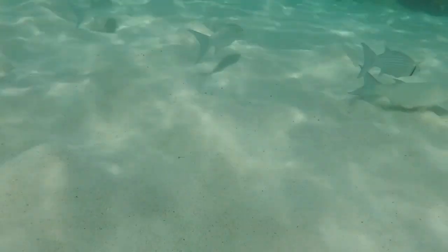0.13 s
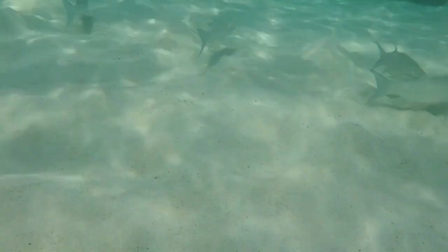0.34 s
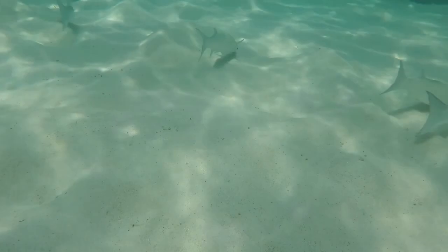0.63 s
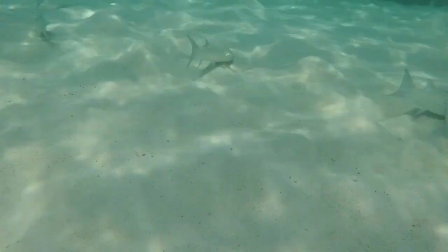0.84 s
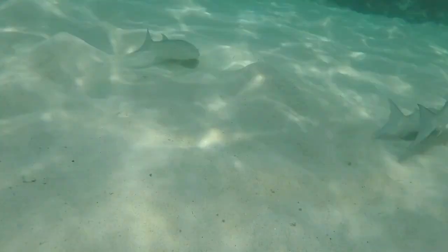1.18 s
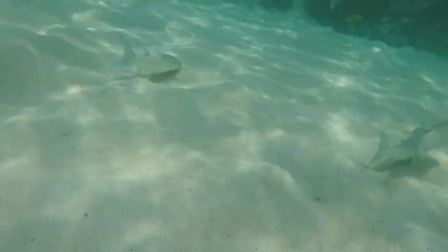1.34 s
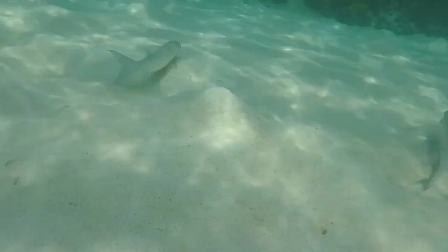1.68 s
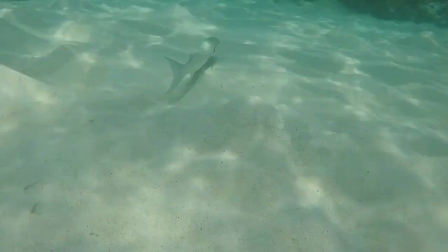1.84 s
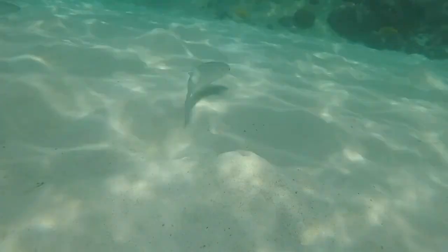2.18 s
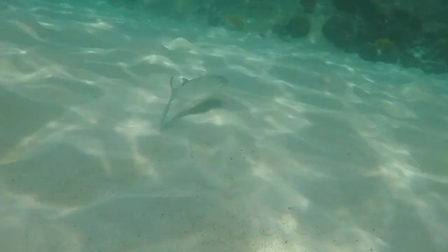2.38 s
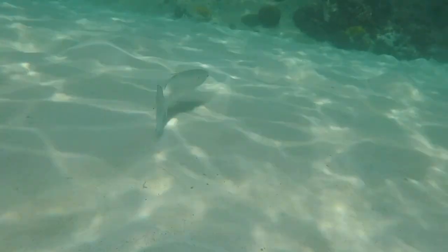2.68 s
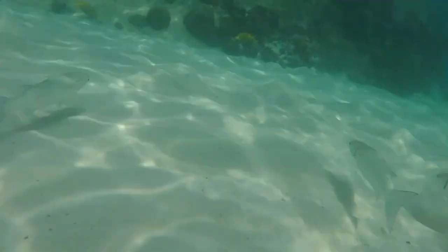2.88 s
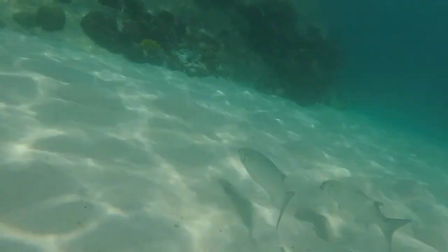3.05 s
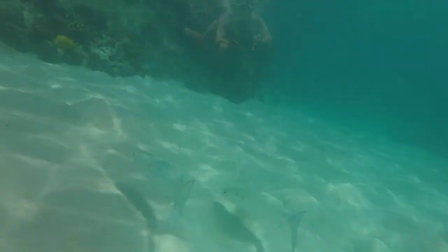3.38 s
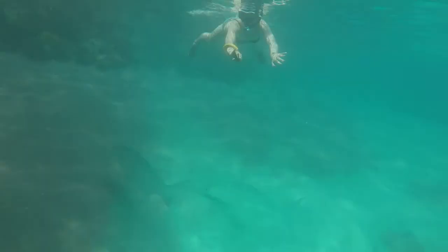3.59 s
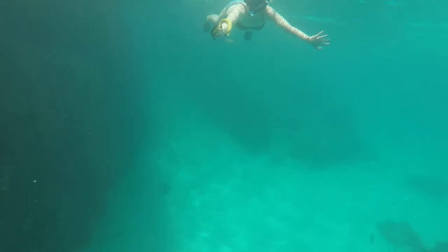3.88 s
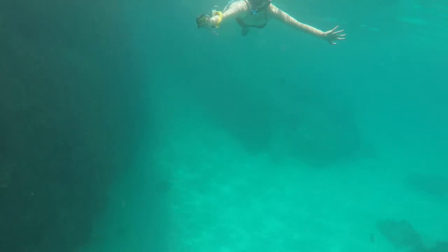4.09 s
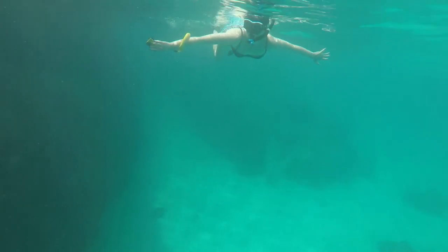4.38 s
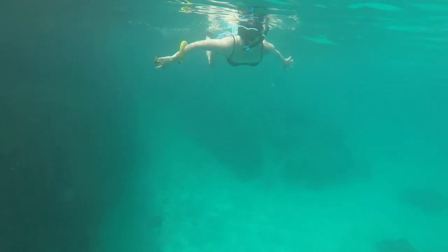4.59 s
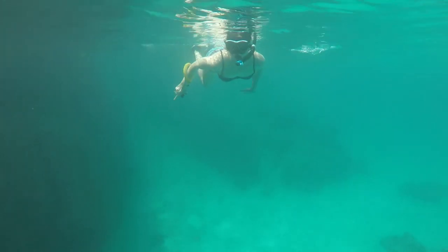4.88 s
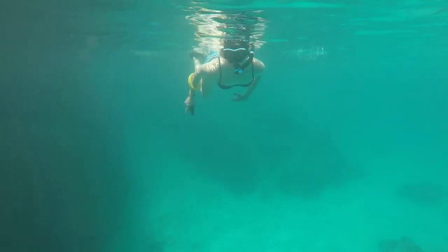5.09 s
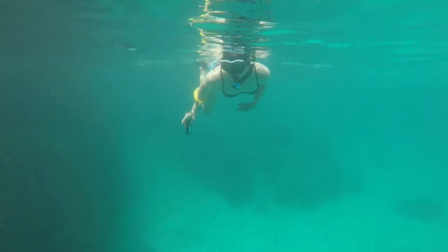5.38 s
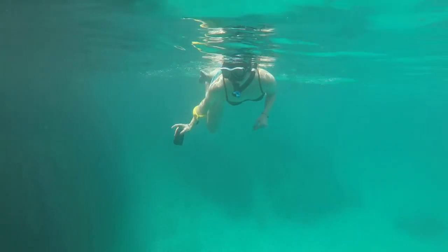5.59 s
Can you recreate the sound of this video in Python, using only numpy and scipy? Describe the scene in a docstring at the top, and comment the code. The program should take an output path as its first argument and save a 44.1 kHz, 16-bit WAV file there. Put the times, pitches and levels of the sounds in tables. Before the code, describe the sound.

Underwater rumble, hollow churning, bubbles and knocks against a camera housing, with fine shrimp crackle, stop suddenly, leaving faint hum, soft ticks and one last bubble.

```python
"""Water rushes round a waterproof camera case: shaped noise rumbles, and pulses churn in the case's resonances.
Bubbles ring as wobbling tones, gurgles as clusters of tones, and knocks as pushes through the case walls.
Behind them snapping shrimp crackle over a reef, made of short noise bursts and random clicks.
The rush stops abruptly and leaves a quiet, centred hum, a duller crackle and one last bubble."""
import sys
import numpy as np
from scipy import signal
from scipy.fft import rfft, irfft
from scipy.io import wavfile
from scipy.ndimage import uniform_filter1d

SR = 44100
rng = np.random.default_rng(int(sys.argv[2]) if len(sys.argv) > 2 else 0)


def put_to_file(sound):
    """Save the sound as 16-bit audio at rate SR, in the file named by the first command-line argument."""
    columns = np.atleast_2d(sound).T  # one column per channel
    safe = np.clip(columns, -1, 1)
    whole_steps = np.round(safe * 32767)
    wavfile.write(sys.argv[1], SR, whole_steps.astype(np.int16))


N = 253120
T = np.arange(N) / SR  # time of every sample (s)


def amp(db):
    """Decibels to gain."""
    return 10 ** (np.asarray(db) / 20)


def unit(x):
    """Scales to rms 1."""
    return x / np.sqrt(np.mean(x ** 2) + 1e-20)


def noise(*shape):
    """White noise: all pitches equally strong."""
    return rng.standard_normal(shape)


def tone(hz, t, phase=0):
    """A steady sine."""
    return np.sin(2 * np.pi * hz * t + phase)


def decay(t, t60):
    """A fade that drops 60 dB in t60 seconds."""
    return amp(-60 * t / t60)


def swell(t, rise_s):
    """A soft start with time constant rise_s."""
    return 1 - np.exp(-t / rise_s)


def read(points, hz):
    """Reads a table on a log-frequency axis."""
    f, value = np.transpose(points)
    return np.interp(np.log(hz + 1), np.log(f + 1), value)


def follow(rows, axis=1):
    """One column of a curve at every sample."""
    rows = np.array(rows)
    return np.interp(T, rows[:, 0], rows[:, axis])


def add(mix, s, sound):
    """Mixes a sound in at time s."""
    part = mix[..., round(s * SR):][..., :sound.shape[-1]]
    part += sound[..., :part.shape[-1]]


def band(x, lo_hz, hi_hz, order=3):
    """Causal band-pass."""
    return signal.sosfilt(signal.butter(order, [lo_hz, hi_hz], "band", fs=SR, output="sos"), x)


def colour(x, points, size=8192):
    """Causal filter of unit energy whose spectrum has the table's shape."""
    log_gain = np.log(amp(read(points, abs(np.fft.fftfreq(size, 1 / SR)))))
    # the Hilbert transform of the log gain gives the phase that makes the filter respond at once
    taps = np.fft.ifft(np.exp(np.conj(signal.hilbert(log_gain)))).real[:size // 2]
    taps = taps / np.linalg.norm(taps)
    return signal.fftconvolve(np.atleast_2d(x), taps[None], axes=1)[:, :N]


def spread(pair, likeness):
    """Mixes two unrelated signals into left and right of a given likeness."""
    same = np.clip(read(likeness, np.fft.rfftfreq(N, 1 / SR)), -1, 1)
    mid, side = irfft(rfft(pair) * np.sqrt([1 + same, 1 - same]), N) / np.sqrt(2)
    return np.array([mid + side, mid - side])


def clicks(per_s, spread_db):
    """Random clicks of uneven size and either sign."""
    size = amp(spread_db * np.minimum(rng.exponential(1, N), 4))
    return size * rng.choice([-1, 1], N) * (rng.random(N) < per_s / SR)


# How strongly water moves past the case; churn and blips follow it too.
# Each row: time in seconds, buffeting in dB, churning in dB (both are base levels).
WATER_FLOW = [(0.0, -30, -43), (0.08, -27, -37), (0.45, -31.5, -40.5), (1.66, -26, -40.5),
              (2.69, -28.5, -43), (2.91, -23, -45), (3.04, -26, -40.5), (4.01, -26.5, -42.5),
              (4.19, -24, -43.5), (4.3, -28, -43)]
# Tone of the rumbling eddies, also used by the wake. Each row: frequency in Hz, relative level in dB.
RUMBLE_TONE = [(10, -2), (22, 1.5), (45, -2.5), (70, -9.5), (100, -12.5), (128, -12.5), (190, -24.5),
               (330, -30), (700, -37), (6000, -100)]
# How alike the rumble is left and right. Each row: frequency in Hz, likeness from -1 to 1.
RUMBLE_LIKENESS = [(40, 0.75), (85, 0), (140, 0.034), (400, 0.77)]


def rumble():
    """Eddies buffet the case: low noise that follows the flow, a little stronger on the right."""
    eddies = spread(colour(noise(2, N), RUMBLE_TONE), RUMBLE_LIKENESS)
    return unit(eddies) * amp(follow(WATER_FLOW) + np.array([[1.0], [2.4]]))


# Resonances of the case. Each row: frequency in Hz, width in Hz before damping,
# relative level in dB before scaling by width, left-right phase difference in radians,
# left-right level difference in dB.
CASE_MODES = [(357.5, 47, -11.5, 0.086, 37.5), (466.6, 35, 1.5, 0.7, -6), (598.7, 64.6, 7, 1.13, 10),
              (935, 67, 8, 2.77, 2), (983, 256, 7.5, 2.934, -2), (1339, 135, 10.5, 2.156, 0),
              (1481, 55, -4.5, 5.56, 6), (1708, 97, -7.5, 1.7, -20), (2190, 140, -26, 2.9, 25),
              (2540, 110, -26.5, 0.4, 17), (2910, 120, -12.5, 0.5, 0)]


def case(x, damping_hz):
    """The walls ring, each mode reaching the two microphones in its own phase."""
    t, ring = T[:SR // 8], 0
    half = np.array([[.5], [-.5]])  # each side takes half of the difference
    for hz, width_hz, db, phase, lean_db in CASE_MODES:
        fade = np.exp(-np.pi * (width_hz + damping_hz) * t)
        wave = np.cos(2 * np.pi * hz * t + half * phase)
        ring = ring + amp(db + half * lean_db) * width_hz * fade * wave
    return signal.fftconvolve(x[None], ring, axes=1)[:, :len(x)]


def sides(hz):
    """Phase at the left and right microphone of a tone that passes the case."""
    modes = np.array(CASE_MODES)
    return np.array([[.5], [-.5]]) * np.interp(hz, modes[:, 0], modes[:, 3])


def patchy(x, depth_db):
    """Pockets of air come and go: narrow ranges of pitch are lifted or lowered for a moment."""
    z = signal.stft(x, nperseg=512)[2]
    field = noise(*z.shape[1:])
    for _ in range(2):  # smooth over pitch, then over time
        field = uniform_filter1d(uniform_filter1d(field, size=3, axis=0), size=6, axis=1)
    gain = amp(depth_db * np.clip(unit(field), -2, 2))
    return signal.istft(z * gain, nperseg=512)[1][:, :N]


def churn(surge_db=1.9):
    """Swarms of small pressure pulses ring the case, in uneven surges."""
    surge = amp(surge_db * unit(band(noise(N), 5.1, 17.8, order=2)))
    pulses = surge * clicks(per_s=1100, spread_db=2.7)
    ring = patchy(case(pulses, damping_hz=0), depth_db=3.8)
    low = unit(band(ring, 270, 1154)) * amp(follow(WATER_FLOW, axis=2) + 6.5)
    # the high resonances grow slowly: dB at the start, then dB per second
    high = unit(band(ring, 1207, 3030)) * amp(-41.5 + 0.57 * T)
    return low + high


# Larger bubbles. Each row: start in seconds, level in dB before the swell softens it, pitch in Hz,
# time to fade by 60 dB in seconds, swell time constant in seconds.
BUBBLE_LIST = [(.116, -16, 591, 0.075, 0.0044), (0.513, -24.5, 1316, 0.1, .001),
               (1.708, -22, 581, 0.12, 0.011), (1.916, -20.5, 1300, 0.068, 0.00043),
               (2.059, -16.5, 1344, 0.041, 0.00031), (2.166, -19, 1411, 0.056, 0.00041),
               (2.616, -17.5, 609, 0.074, 0.0073), (3.109, -15, 617, 0.093, 0.00028),
               (3.109, -12, 1200, 0.022, 0.00043), (3.126, -19.5, 1254, 0.07, .002),
               (3.195, -15, 621, 0.058, 0.0039), (3.212, -16, 642, 0.093, 0.0025),
               (3.213, -15, 1318, 0.076, 0.0018), (3.2533, -1, 1060, 0.013, 0.0012),
               (3.281, -18.5, 726, 0.037, 0.0018), (3.282, -13, 1325, 0.061, 0.0044),
               (3.378, -14.5, 1353, 0.055, 0.0024), (3.586, -17.5, 737, 0.034, 0.00034),
               (3.686, -15.5, 708, 0.035, .001), (3.781, -13.5, 630, 0.047, .005),
               (3.827, -20.5, 2610, 0.023, 0.0012), (3.902, -15, 680, 0.048, 0.0017),
               (3.916, -22, 1444, 0.035, 0.0012), (3.939, -26.5, 2580, 0.029, 0.0024),
               (3.976, -17.5, 1414, 0.025, .001), (4.083, -15.5, 615, 0.038, 0.0016),
               (4.25, -24, 1810, 0.039, .001), (4.338, -22, 1345, .05, .002)]


def bubbles():
    """Larger bubbles pinch off against the case and ring briefly, wobbling in pitch as they change shape."""
    out, t = np.zeros((2, N)), T[:SR // 6]
    for s, db, hz, t60, swell_s in BUBBLE_LIST:
        wobble = 0.041 * unit(band(noise(len(t)), 41, 340, order=2))  # share of the pitch
        turns = hz * np.cumsum(1 + wobble) / SR
        ring = tone(1, turns, sides(hz))
        add(out, s, ring * amp(db) * decay(t, t60) * swell(t, swell_s))
    return out


# Knocks on the case. Each row: start in seconds, level at the strongest pitch in dB, that pitch in Hz,
# drop on either side in dB per octave, rattle length in seconds (the rattle's 60 dB fade takes 2.45 of these).
KNOCK_LIST = [(.453, -43, 1340, 5.5, 0.017), (2.208, -28.5, 427, 19, 0.026), (2.244, -34.5, 450, 15, .035),
              (2.282, -32.5, 395, 12, 0.035), (2.7548, -30, 265, 1, 0.0091), (3.254, -31.5, 855, 22, 0.042),
              (3.312, -36, 1030, 19, 0.024), (3.529, -34, 750, 25, 0.024),
              (3.586, -40.5, 1250, 3.5, 0.0071), (3.641, -29, 1410, 21, 0.019),
              (3.6827, -32.5, 786, 6.5, 0.017), (3.7253, -24.5, 400, 9.5, 0.023),
              (3.901, -39, 790, 7.5, 0.023), (4.243, -38, 800, 15, 0.02)]
# Pitch ranges in which a knock's ring is levelled. Each row: lower edge in Hz, upper edge in Hz.
KNOCK_RANGES = [(110, 480), (480, 1150), (1150, 1800), (1750, 2700)]


def knocks(rattle=0.13):
    """Each knock is a sharp push with a short rattle, heard through the damped walls, plus a thump."""
    out, t = np.zeros((2, N)), T[:SR // 8]
    thump_hz = 161
    # the whole case is jolted: 11.5 dB on top of the knock's level at this pitch
    thump = tone(thump_hz, t) * amp(11.5) * decay(t, 0.059)
    for s, db, pitch_hz, fall_db, length_s in KNOCK_LIST:
        push = rattle * noise(len(t)) * decay(t, 2.45 * length_s)
        push[0] += 1.5
        ring = case(push, damping_hz=55.0)
        add(out, s, thump * amp(db - fall_db * abs(np.log2(thump_hz / pitch_hz))))
        for lo, hi in KNOCK_RANGES:
            octaves = abs(np.log2(np.sqrt(lo * hi) / pitch_hz))
            add(out, s, unit(band(ring, lo, hi, order=4)) * amp(db - fall_db * octaves))
    return out


# Small clouds of air torn loose. Each row: middle in seconds (the cloud is set 4 ms earlier),
# length in seconds, centre pitch in Hz, level in dB.
GURGLE_LIST = [(0.18, 0.064, 760, -34.5), (0.766, 0.06, 780, -30), (.95, 0.064, 730, -35),
               (1.032, 0.055, 1080, -32.5), (1.206, 0.035, 466, -37), (1.346, 0.067, 463, -35.5),
               (1.616, 0.11, 825, -32.5), (1.639, 0.085, 1694, -30), (2.077, 0.077, 940, -33),
               (2.368, 0.02, 1680, -32.5), (2.923, 0.11, 560, -35.5), (3.938, 0.069, 946, -29),
               (4.256, 0.023, 840, -27)]


def gurgles(scatter_hz=290, t60=0.017, rise=0.6):
    """Each is a cluster of tiny bubbles of like size, every one rising a little in pitch as it rings."""
    out, t = np.zeros((2, N)), T[:SR // 25]
    for s, length, pitch_hz, db in GURGLE_LIST:
        cloud = np.zeros((2, SR // 4))
        for when, size, shape in rng.random(size=(28, 3)):
            hz = pitch_hz + scatter_hz * (size - shape)
            ring = tone(hz, t * (1 + rise * t), sides(hz)) * decay(t, t60) * swell(t, 0.0002)
            add(cloud, when * length, ring * np.sin(np.pi * when))  # loudest mid-cloud
        level = amp(db) * np.sqrt(length * SR / np.sum(cloud ** 2))
        add(out, s - length / 2 - .004, cloud * level)
    return out


def blips(t60=0.05, blip_db=11, spread_db=7, detune=0.16, count=70):
    """Stray small bubbles sound softly round two pitches of the case, as loud as the churning lets them."""
    out, t = np.zeros((2, N)), T[:SR // 12]
    for when, which, size, strength in rng.random((count, 4)):
        hz = (605 if which < .5 else 1350) * (1 + detune * (size - .5))
        ring = tone(hz, t, sides(hz)) * decay(t, t60) * swell(t, 0.0029)
        add(out, when * N / SR, ring * amp(blip_db + spread_db * (strength - .5)))
    return out * amp(follow(WATER_FLOW, axis=2))


# Snaps of the nearest shrimp. Each row: start in seconds, bright click in dB, low crack in dB.
SNAP_LIST = [(0.046, -54.5, -57), (0.134, -51, -48), (0.173, -51.5, -51.5), (0.2335, -49, -69),
             (0.295, -43.5, -62), (0.452, -41, -42.5), (0.473, -48.5, -44.5), (.565, -52, -66),
             (0.649, -42.5, -53), (0.709, -50, -70), (0.803, -46.5, -68), (1.009, -53.5, -56),
             (1.15, -52, -47.5), (1.2447, -46.5, -53), (1.4031, -45, -50), (1.479, -47.5, -64),
             (1.9818, -53, -45), (1.998, -53, -57), (2.122, -41.5, -72), (2.13, -44, -72),
             (2.264, -62, -48), (2.574, -54.5, -68), (2.682, -49, -50), (3.198, -58, -43.5),
             (3.2702, -45.5, -52), (3.531, -52.5, -51), (3.619, -47.5, -51), (3.64, -42, -33),
             (3.807, -57, -41.5), (4.0196, -37.5, -64), (4.089, -50, -46), (4.102, -46, -43),
             (4.128, -45.5, -43.5), (4.295, -49, -50), (4.4151, -66.5, -45), (4.455, -69, -52),
             (4.469, -66, -50), (4.478, -62, -62), (4.5022, -63, -55.5), (4.626, -79, -62),
             (4.6517, -58.5, -47.5), (4.8069, -62, -52), (4.832, -77, -55), (4.891, -69, -58.5),
             (4.904, -69, -55), (5.0187, -73, -55.5), (5.049, -70, -59), (5.12, -70, -59.5),
             (5.1452, -66, -61), (5.277, -57.5, -53), (5.314, -77, -60), (5.423, -70, -53.5),
             (5.458, -60.5, -57.5), (5.662, -58.5, -61), (5.726, -61, -60)]
# Tone of bright clicks, here and in the distance. Each row: frequency in Hz, relative level in dB.
CLICK_TONE = [(1200, -35), (2900, -4.5), (3700, -5), (4350, -5.5), (4750, -0.5), (6500, -0.5), (7000, -4),
              (7900, -9), (9000, -19), (11000, -26.5), (14000, -34), (16000, -39)]
# Tone of low cracks, here and in the calm. Each row: frequency in Hz, relative level in dB.
CRACK_TONE = [(600, -12.5), (1050, -8), (1450, 9), (1850, -4), (2100, 7), (2350, 2.5), (2700, 7.5),
              (3150, -3), (3600, -8), (12000, -101.5)]


def shrimp(t60, echo, rise_s, tint_db=4, count=9):
    """Claw snaps: a bright click and a lower, ringing crack, each tinted by its own path over the sand."""
    bright, low, t = np.zeros((2, N)), np.zeros((2, N)), T[:SR // 20]
    shape = (np.exp(-t / .0011) + echo * decay(t, t60)) * swell(t, rise_s)
    path_hz = np.geomspace(2000, 12000, count)
    for s, click_db, crack_db in SNAP_LIST:
        tint = np.c_[path_hz, tint_db * rng.uniform(-1, 1, count)]
        burst = noise(2, len(t)) * shape
        snap = unit(colour(burst, tint, size=512)[:, :len(t)])
        add(bright, s, snap * amp(click_db))
        add(low, s, snap * amp(crack_db))
    ring = tone(3000, t) * decay(t, 0.05)  # the crack leaves a short ring in the case
    ringing = signal.oaconvolve(low, ring[None] / np.linalg.norm(ring), axes=1)[:, :N]
    return colour(bright, CLICK_TONE) + colour(low, CRACK_TONE) + amp(-8.5) * ringing


def colony(per_s, spread_db, t60, echo=0.4, count=8):
    """Random snaps from several patches of reef, each patch with its own short scatter."""
    t, out = T[:SR // 25], 0
    for _ in range(count):
        scatter = noise(2, len(t)) * (np.exp(-t / 0.00015) + echo * decay(t, t60))
        patch = clicks(per_s / count, spread_db)
        out = out + signal.oaconvolve(patch[None], scatter, axes=1)[:, :N]
    return unit(out)


def fizz():
    """Distant shrimp blend into a fizz that grows slowly."""
    dense = colony(per_s=2100, spread_db=-1.5, t60=0.012)
    sparse = colony(per_s=67, spread_db=4.5, t60=0.08, echo=1.0, count=4)
    # dB at the start, then dB per second
    return unit(colour(dense + amp(-2.5) * sparse, CLICK_TONE)) * amp(-56.5 + 0.64 * T)


def ticks():
    """Shrimp at middle distance are sparse enough to be heard one by one."""
    midway = colony(per_s=26, spread_db=2, t60=0.035, echo=0.25, count=8)
    return unit(colour(midway, CLICK_TONE)) * amp(-58)


# Tone of the faint hiss. Each row: frequency in Hz, relative level in dB.
HISS_TONE = [(2000, -34), (7000, 0), (9000, 1.5), (11000, -2.5), (13000, -11.5), (16000, -48)]


def hiss():
    """A faint, steady bed of high noise."""
    return unit(colour(noise(2, N), HISS_TONE)) * amp(-62.5)


# How alike the reef sounds left and right. Each row: frequency in Hz, likeness from -1 to 1.
REEF_LIKENESS = [(2400, -.4), (2900, .5), (3600, .55), (4000, -.1), (5000, .7), (6200, .1), (6800, -.5),
                 (7900, .55), (9000, .1)]


def rush(near):
    """Everything heard while water streams past the case, with the near snaps."""
    reef = spread(fizz() + ticks() + hiss() + near, REEF_LIKENESS) * amp([[-.8], [.8]])
    return rumble() + churn() + blips() + gurgles() + knocks() + bubbles() + reef


# Ring of the last bubble's pulses. Each row: frequency in Hz, level in dB before the pulse's own level,
# time to fade by 60 dB in seconds.
PULSE_RING = [(1100, -35, 0.015), (1380, -28, 0.018), (2190, -34, .014), (2600, -35, 0.017)]
# The pulses as it breaks free. Each row: start in seconds, gain on the ring in dB,
# swell time constant in seconds.
PULSE_LIST = [(5.5926, 5.5, .001), (5.5959, 4, 0.00093), (5.5975, -1, .0006)]


def plink(waver=0.036):
    """One last bubble: a wobbling note swells and fades, and short pulses ring as it breaks free."""
    since, t = T - 5.598, T[:SR // 8]  # time from the note's peak
    wobble = waver * unit(band(noise(N), 54, 250, order=2))
    turns = 1419 * np.cumsum(1 + wobble) / SR  # pitch in Hz
    slopes = np.exp(np.minimum(since / 0.0058, -since / .011))  # time constants (s)
    out = amp(-32) * tone(1, turns) * slopes
    ring = sum(tone(hz, t) * amp(db) * decay(t, t60) for hz, db, t60 in PULSE_RING)
    for s, level_db, swell_s in PULSE_LIST:
        add(out, s, ring * amp(level_db) * swell(t, swell_s))
    return out * amp([[-3], [2.5]])  # leans right


CALM_S = 4.357  # the rush stops (s)


def wake():
    """Low eddies die away after the rush, by 15 dB per second."""
    since = np.maximum(T - CALM_S, 0)
    return unit(colour(noise(N), RUMBLE_TONE)) * amp(-48 - 15 * since)


def dull_crackle():
    """A sparser colony with more low crack than bright click."""
    far = colony(per_s=240, spread_db=4.5, t60=0.042)[0]
    return colour(far, CRACK_TONE) * amp(-63) + colour(far, CLICK_TONE) * amp(-71.5)


# Tone of the open water. Each row: frequency in Hz, relative level in dB.
HUM_TONE = [(25, -3), (45, -5), (90, -16), (165, 0.5), (260, -3.5), (480, -10), (580, -7), (1000, -15.5),
            (2500, -23.5), (3800, -31.5), (7200, -32), (8800, -24), (15000, -39.5)]


def hum():
    """Low hum of open water: shaped noise plus a narrow low band."""
    water = unit(colour(noise(N), HUM_TONE)) * amp(-51.5)
    return water + unit(band(noise(N), 147, 190, order=2)) * amp(-55.0)


def calm(near):
    """Hum, dying eddies, duller crackle and near snaps in the centre; a last bubble to the right."""
    return hum() + wake() + dull_crackle() + near[:1] + plink()


def scene():
    """The rush gives way to the calm within 2 ms; the snaps turn from crisp to blunt."""
    settled = np.clip((T - CALM_S) / 0.002 + .5, 0, 1)
    crisp = shrimp(t60=.05, echo=.14, rise_s=.0002)
    blunt = shrimp(t60=0.069, echo=0.18, rise_s=0.00091)
    return (1 - settled) * rush(crisp) + settled * calm(blunt)


def record(dry):
    """The recorder's band limit: a low-pass at 15600 Hz."""
    taps = signal.firwin(511, 15600, window=("kaiser", 9), fs=SR)
    return signal.oaconvolve(dry, taps[None], "same")


dry = scene()
out = record(dry)
put_to_file(out)
```